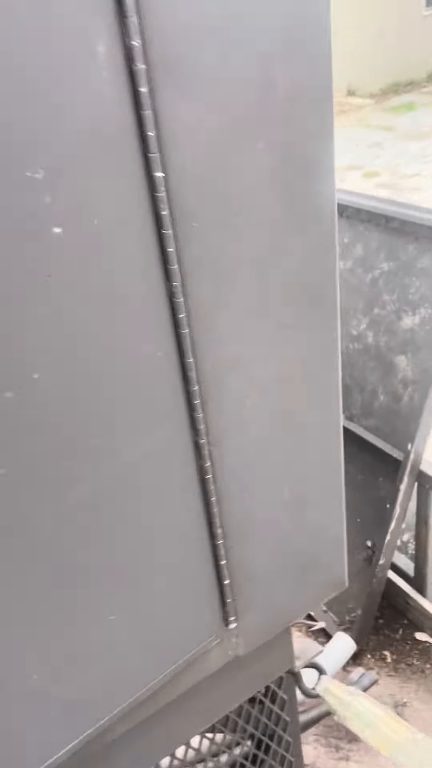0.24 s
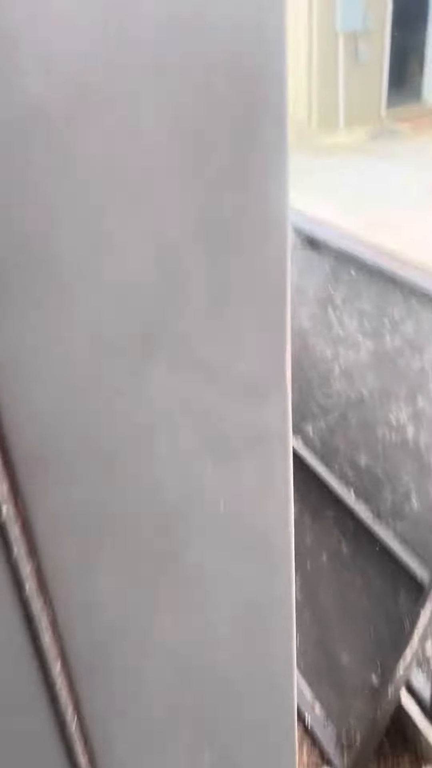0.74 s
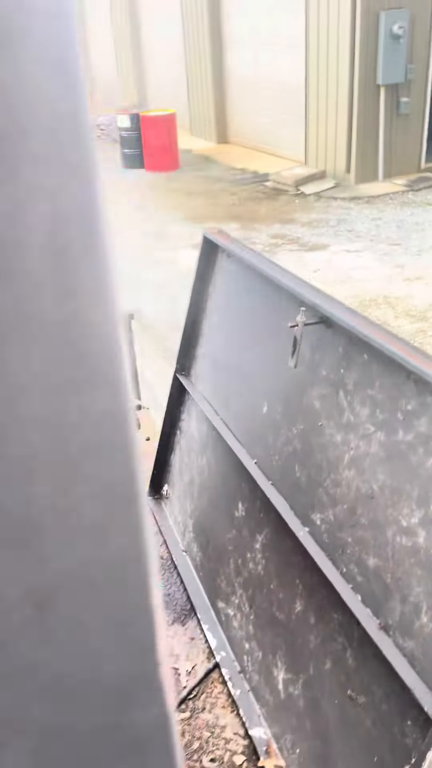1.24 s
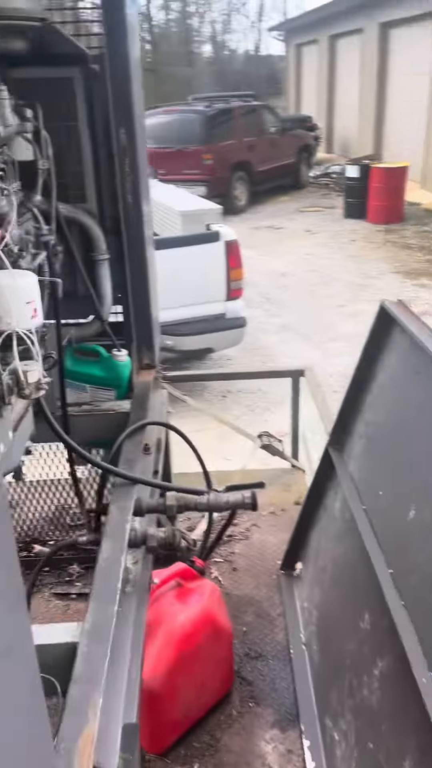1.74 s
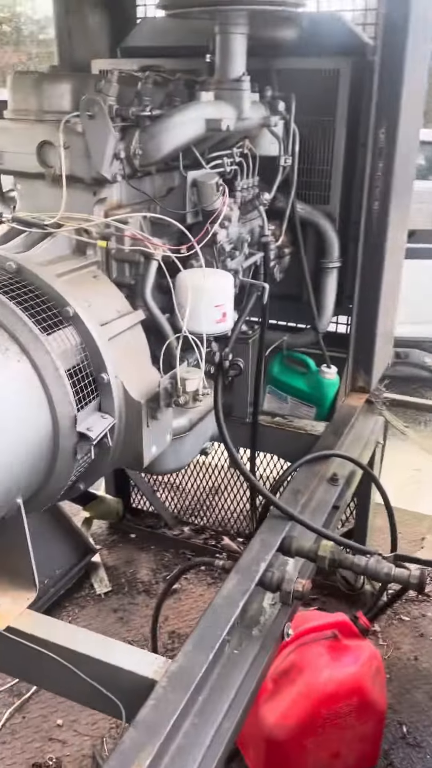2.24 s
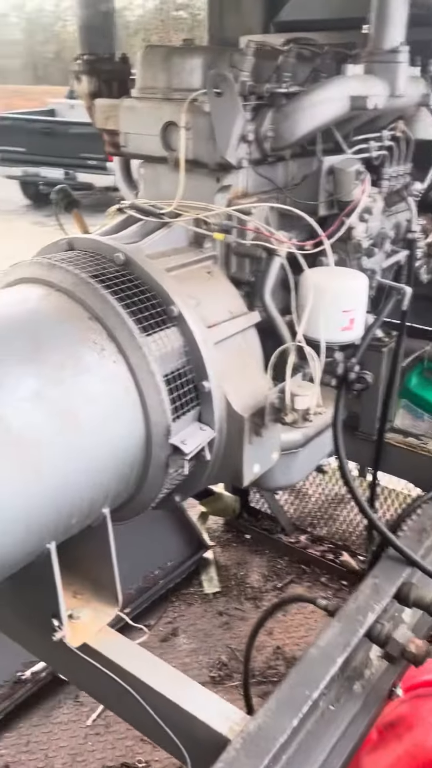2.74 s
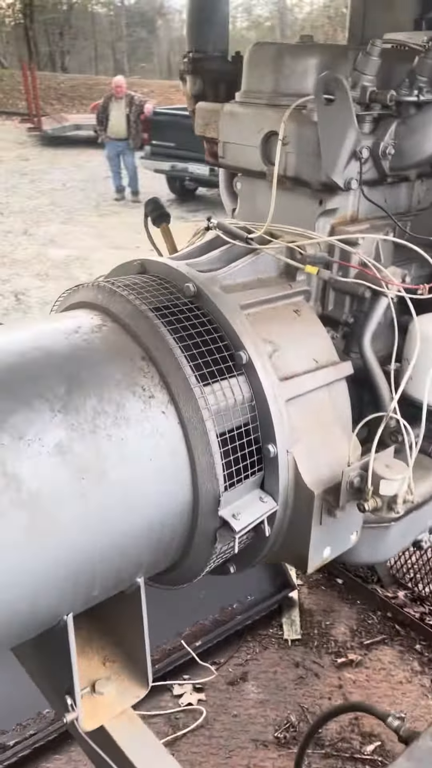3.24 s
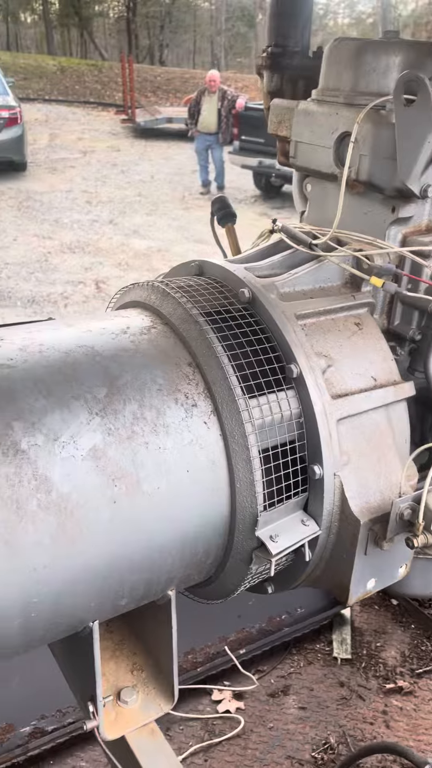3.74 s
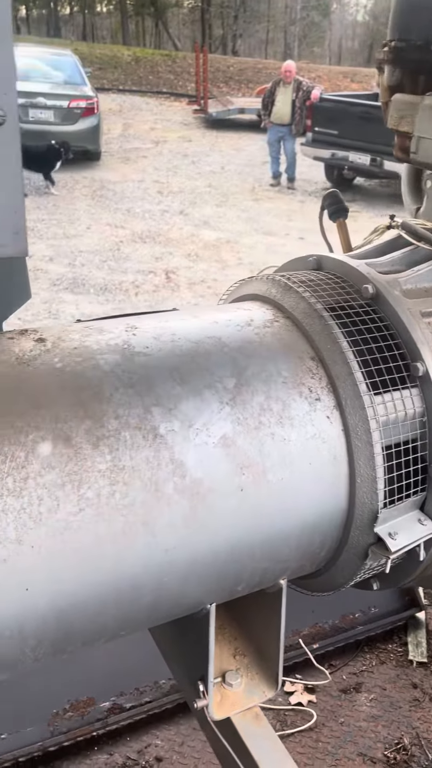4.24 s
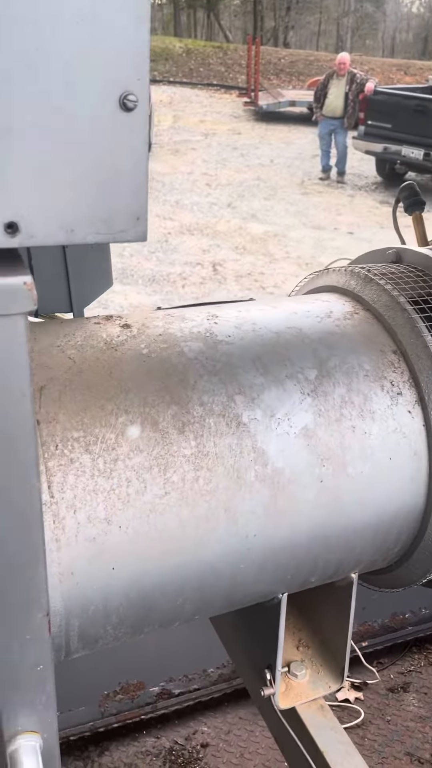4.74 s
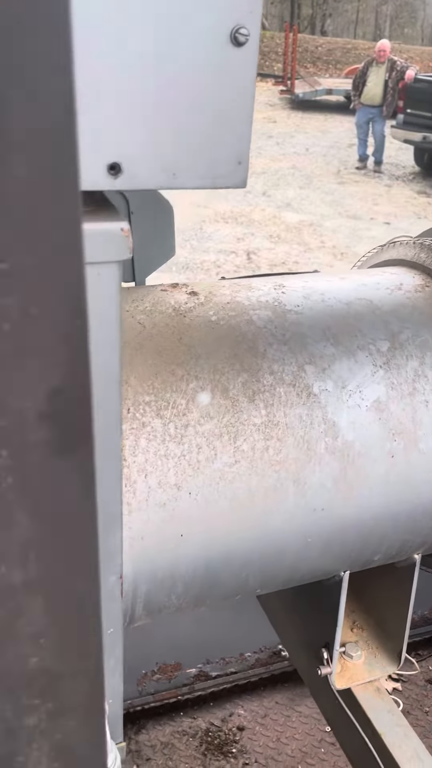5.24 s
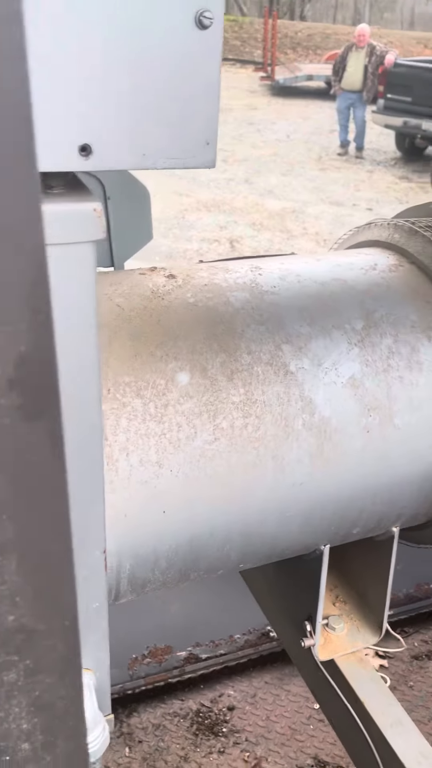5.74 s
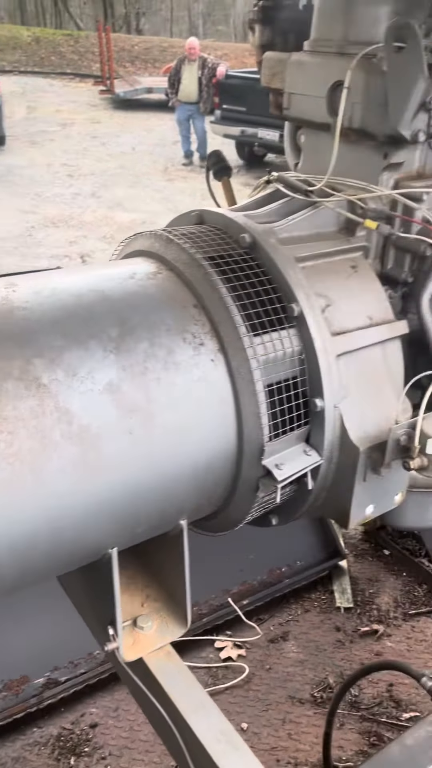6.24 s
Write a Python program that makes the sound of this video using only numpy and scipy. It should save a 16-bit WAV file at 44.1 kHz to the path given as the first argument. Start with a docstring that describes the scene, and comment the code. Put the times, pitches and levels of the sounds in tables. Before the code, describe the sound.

A diesel generator drones at constant speed, muffled behind a metal panel at first, then louder and clattering as the listener walks to its open side.

```python
"""Diesel generator set in an open yard

A diesel generator set runs at steady speed inside a sheet-metal housing; the listener walks round a panel
to the open side. Firing orders and a fan-blade hum are sines locked to the shaft. Housing boom, air roar,
knock, clatter, rattle and hiss are shaped noise, swelling with the firing and, from the knock upward, with
ticks. Moving resonances and a thin dashed whine colour the walk. A two-port microphone with a dull top hears it."""
import sys
import numpy as np
from scipy import signal
from scipy.fft import rfft, irfft, next_fast_len
from scipy.io import wavfile

SR = 44100
rng = np.random.default_rng(int(sys.argv[2]) if len(sys.argv) > 2 else 0)


def master_out(mix):
    """Clip the mix to full scale and print it as 16-bit PCM to the path in sys.argv[1]."""
    frames = np.transpose(np.atleast_2d(mix))
    ceiling = np.clip(frames, -1, 1)
    pcm = np.round(ceiling * 32767).astype(np.int16)
    wavfile.write(sys.argv[1], SR, pcm)


def boost_factor(decibels):
    """Convert a level in decibels to a linear amplitude factor."""
    exponent = np.asarray(decibels, float) / 20
    return 10 ** exponent


N = 286209

SHAFT_HZ = 30.595
FIRING_ORDER, FAN_ORDER = 2, 12   # multiples of the shaft speed

# colour of the engine noise, relative from band to band: f/Hz, density/dB
COLOUR = [(40, -70.5), (55, -55.5), (75, -43.5), (100, -51), (140, -56), (200, -46.5), (450, -49),
          (750, -50.5), (1000, -54), (1600, -57.5), (2400, -64.5), (3400, -73), (4500, -71), (5700, -78),
          (7000, -96.5), (7500, -101.1)]


def in_time(rows):
    """Columns of a table that starts with time, one value a sample."""
    s, *columns = np.transpose(rows)
    return [np.interp(np.arange(N) / SR, s, column) for column in columns]


def at_hz(points, hz):
    """Reads a table of (Hz, value) on a log-frequency axis."""
    table_hz, values = np.transpose(points)
    return np.interp(np.log(hz + 1), np.log(table_hz), values)


def skirts(hz, low_hz, high_hz):
    """Gain of a band with fourth-order slopes on both sides."""
    return 1 / np.sqrt((1 + (low_hz / (hz + 1)) ** 8) * (1 + (hz / high_hz) ** 8))


def unit_mid(x):
    """Scales a stereo pair so that the mean of its channels has rms 1."""
    return x / np.sqrt(np.mean(x.mean(axis=0) ** 2) + 1e-20)


def drift(corner_hz):
    """Slow chance of spread 1: noise at every 40th sample through a double one-pole."""
    pole = np.exp(-2 * np.pi * corner_hz * 40 / SR)
    noise = rng.standard_normal(N // 40 + 2002)
    slow = signal.lfilter([1], [1, -2 * pole, pole ** 2], noise)[2000:]   # settled part only
    return np.interp(np.arange(N) / 40, np.arange(len(slow)), slow / slow.std())


def bells(rows, spread_s):
    """Bell-shaped rises, one for each (time in s, height)."""
    now = np.arange(N) / SR
    return sum(height * np.exp(-.5 * ((now - s) / spread_s) ** 2) for s, height in rows)


def ports(hz):
    """Complex gain of each microphone port: half the balance and half the phase lead to either side."""
    # left over right: f/Hz, level/dB
    balance = [(80, 0.8), (170, -2.5), (300, -6), (480, -1), (750, 2.5), (1200, 0), (1550, 3), (1950, -6),
               (2400, 0), (3500, 0), (4600, 2.5), (5700, 2.5), (6400, 0.5)]
    # left ahead of right: f/Hz, phase/rad
    lead = [(70, 0), (170, -.4), (260, .1), (500, 1.4), (750, 2.0), (1150, 3.0), (1460, 2.0), (1810, 3.0),
            (2150, 2.2), (2500, 2.8), (3450, 2.5), (4200, .5), (5500, 1.3), (6500, .9), (7200, 3.1),
            (8400, 3.0), (9400, 1.6), (10200, 0)]
    sides = np.array([[.5], [-.5]])
    return boost_factor(sides * at_hz(balance, hz)) * np.exp(1j * sides * at_hz(lead, hz))


def port_noise(shape):
    """Noise of a given spectral shape at both ports: a shared part and a part of their own."""
    # how far the ports hear the same noise: f/Hz, likeness/0-1
    likeness = [(80, 0.96), (300, 0.87), (560, 0.64), (740, 0.6), (1050, 0.38), (1330, 0.13), (1500, 0.42),
                (1700, 0.12), (1930, 0.72), (2280, 0.17), (2600, 0.67), (4250, 0.82), (5000, 0.39),
                (6800, 0.5), (7400, 0.93)]
    size = next_fast_len(N)
    hz = np.arange(size // 2 + 1) * SR / size
    shared, *own = rfft(rng.standard_normal((3, size)))
    # the deep bass is all but the same at both ports
    alike = np.clip(at_hz([(70, .995)] + likeness[1:], hz), 0, 1)
    both = np.sqrt(alike) * shared + np.sqrt(1 - alike) * np.array(own)
    return unit_mid(irfft(both * ports(hz) * shape(hz), size)[:, :N])


def noise_band(hz, width_hz):
    """Narrow noise: low-passed complex noise shifted up to a centre that may move."""
    lowpass = signal.butter(4, width_hz / 2, fs=SR, output="sos")
    slow = signal.sosfilt(lowpass, rng.standard_normal((2, N)))
    carrier = np.exp(2j * np.pi * np.cumsum(hz + np.zeros(N)) / SR)
    band = (slow[0] + 1j * slow[1]) * carrier
    return unit_mid((band * ports(np.atleast_1d(hz))).real)


def tone(turns, hz, db, waver_db):
    """A sine of given rms level that wavers slowly, placed by the ports."""
    gains = ports(np.array([hz]))
    wave = np.exp(2j * np.pi * (turns + rng.random())) * gains / abs(gains.mean())
    return np.sqrt(2) * boost_factor(db + waver_db * drift(5.7)) * wave.real


def orders(turns, heard, roar_db):
    """Firing, alternator and fan-blade tones, all whole multiples of the shaft speed."""
    # the two main tones swell and sink across their standing waves: t/s, firing level/dB, fan-blade level/dB
    hum = [(0, -31, -21.5), (.4, -29, -25), (.8, -38.5, -26.5), (1.2, -29.5, -27.5), (1.45, -28.5, -28.5),
           (1.65, -28.5, -38), (1.85, -26.5, -27.5), (2.05, -24, -30), (2.35, -28.5, -26),
           (2.6, -24, -23.5), (2.9, -29, -23.5), (3.2, -30, -21.5), (3.6, -27.5, -20), (4.0, -26, -22),
           (4.35, -32.5, -22), (4.7, -29.5, -24.5), (5.1, -34, -25), (5.4, -29, -25.5), (5.7, -51, -24),
           (6.0, -42.5, -25), (6.49, -39, -21)]
    # overtones of the firing: order, level behind the panel/dB, gain in open view/dB,
    # gain along the set/dB, waver/dB
    overtones = [(4, -37.5, 7, 3, 0.94), (6, -35, -5, 7, 2.5), (8, -41.5, 0.5, -10.5, 3),
                 (16, -43, 2, 4.5, 2)]
    # weaker tones that follow the roar: order, level against the roar/dB
    weak_orders = [(5, -18.5), (10, -21), (11, -19), (13, -27), (14, -22), (18, -25), (19, -30.5)]
    out = 0
    for order, db in zip((FIRING_ORDER, FAN_ORDER), in_time(hum)):
        out = out + tone(order * turns, order * SHAFT_HZ, db, waver_db=1.0)
    for order, hidden_db, view_db, along_db, waver_db in overtones:
        out += tone(order * turns, order * SHAFT_HZ, heard(hidden_db, view_db, along_db), waver_db)
    for order, db in weak_orders:
        out += tone(order * turns, order * SHAFT_HZ, roar_db + db, waver_db=5.5)
    return out


def combustion(turns):
    """Every firing sets the block ringing the same way; the ring changes slowly with the listener's place."""
    cylinders_db = np.array([0, -3, -1, -4])   # strength of each in firing order
    block_t60_s, path_lasts_s = .12, 1.3
    count = np.floor(FIRING_ORDER * turns).astype(int)
    strength_db = cylinders_db[count % len(cylinders_db)] + 2.4 * rng.standard_normal(N)
    pulses = np.diff(count, prepend=0) * boost_factor(strength_db)

    def shape(hz):
        return boost_factor(at_hz(COLOUR, hz)) * skirts(hz, 650, 2600)

    paths = port_noise(shape)
    now, size = np.arange(N) / SR, int(block_t60_s * SR)
    ring_sample = np.arange(size)
    decay = boost_factor(-60 * ring_sample / size) * np.minimum(ring_sample / (.002 * SR), 1)   # 2 ms onset
    out = 0
    for k, s in enumerate(np.arange(0, N / SR + path_lasts_s, path_lasts_s)):
        ring = paths[:, k * size:(k + 1) * size] * decay
        # each path from block to listener crossfades into the next
        share = np.cos(np.pi / 2 * np.clip((now - s) / path_lasts_s, -1, 1))
        out = out + share * signal.fftconvolve(ring, pulses[None], axes=1)[:, :N]
    return unit_mid(out)


def ticks(per_s, decay_s):
    """Valve and injector ticks: sudden swells of uneven size that die away fast."""
    hits = (rng.random(N) < per_s / SR) * rng.exponential(1, N)
    return signal.lfilter([1], [1, -np.exp(-1 / (decay_s * SR))], hits + 1e-18)


def panel_echoes(x, echo_db):
    """Reflections off the housing panels; paths change as the listener moves, so peaks and dips wander."""
    lags_s, sway_s = [.0029, .0047, .0076, .0119], 0.000615
    out, now = x.copy(), np.arange(N)
    for lag_s in lags_s:
        read = np.abs(now - SR * (lag_s + sway_s * drift(0.6145)))
        out += boost_factor(echo_db) * np.array([np.interp(read, now, side) for side in x])
    return unit_mid(out)


def broad(part, level_db, swell, flicker_db, echo_db):
    """One stretch of the noise colour, swelling with the engine's beat and flickering slowly."""
    # borders between the six stretches: f/Hz
    splits = [120, 500, 1000, 1800, 3500]
    # faint treble, continuing the colour upward: f/Hz, density/dB
    air = [(8400, -102), (9300, -106), (10500, -109), (12300, -112), (12900, -130)]
    # rings and dips of housing and engine casting: f/Hz, width/Hz, gain/dB
    casting = [(77.6, 12, 2), (98, 3.1, -6), (102, 13, 5.5), (207, 5.1, -3.5), (640, 4, 4), (742, 130, 2.5),
               (1260, 250, 3), (1562, 78, 3), (1712, 99, 3.5), (2250, 270, 2)]
    low_hz, high_hz = ([1] + splits + [SR])[part:part + 2]

    def shape(hz):
        rings_db = sum(db / (1 + (2 * (hz - mode_hz) / width_hz) ** 2) for mode_hz, width_hz, db in casting)
        return boost_factor(at_hz(COLOUR + air, hz) + rings_db) * skirts(hz, low_hz, high_hz)

    noise = panel_echoes(port_noise(shape), echo_db)
    return boost_factor(level_db + flicker_db * drift(3.4)) * (1 + swell) * noise


def boom(level_db):
    """The housing's lowest resonance as a narrow noise band that swells now and then."""
    # swells: t/s, gain/dB
    swells = [(.3, 11), (.9, 7), (2.05, 5), (2.7, 4.5), (3.5, 5.5), (4.2, 4), (5.1, 5.5), (6.1, 8.5)]
    return boost_factor(level_db - 2 + bells(swells, spread_s=0.14)) * noise_band(77.1, 16)


def gap():
    """Roar surging unevenly through a resonance beside the panel, rising as the gap widens."""
    # path of the resonance: t/s, f/Hz, level/dB
    gap_path = [(1.1, 201.4, -42), (1.5, 220, -28), (1.75, 310, -28), (2.0, 422, -33), (2.3, 502, -28),
                (2.7, 553, -41.5)]
    hz, db = in_time(gap_path)
    return boost_factor(db + 2.1 * drift(10.0)) * noise_band(hz, width_hz=173)


def spot_rings():
    """Resonances that each swell and fade as the listener passes one spot of the walk."""
    # t/s, spread/s, f/Hz, width/Hz, level/dB
    spots = [(.4, .55, 2850, 703, -56.5), (.4, .45, 1043, 300, -45.5), (.7, 0.25, 2455, 410, -55),
             (0.699, 0.35, 219.7, 80.2, -27.5), (1.5, 0.28, 4920, 1490, -50), (1.5, 0.2, 215, 98.5, -30.5),
             (1.85, 0.28, 254.3, 90.4, -30.5), (2.301, 0.29, 2270, 494, -49),
             (4.499, 0.55, 75.1, 22.1, -29), (1.9, 0.44, 950, 201, -38), (3.301, .3, 115, 30.2, -36),
             (3.5, 0.53, 1570, 160.5, -37.5), (3.5, 0.21, 5300, 1167, -51.5), (4.65, 0.45, 1344, 185, -34),
             (4.75, 0.23, 777, 141, -32), (5.4, 0.47, 1597, 300, -37.5), (5.75, 0.33, 176.4, 40, -37),
             (1.95, 0.057, 420, 70, -25)]
    out = 0
    for s, spread_s, hz, width_hz, db in spots:
        out = out + boost_factor(db) * bells([(s, 1)], spread_s) * noise_band(hz, width_hz)
    return out


def whine():
    """A slightly unsteady high tone, faint throughout, with short dashes early in the walk."""
    # dashes: start t/s, length/s, level/dB
    dashes = [(0, 0.045, -50.5), (.105, 0.082, -54), (0.243, .065, -53), (0.348, .025, -60),
              (0.74, 0.025, -59), (.85, .025, -53), (.94, 0.025, -51)]
    whine_hz, steady_db, edge_s = 4450, -62.5, .012
    turns, now = np.cumsum(whine_hz + 4.8 * drift(40)) / SR, np.arange(N) / SR
    gain = boost_factor(steady_db)
    for s, length_s, db in dashes:
        inside_s = np.minimum(now - s, s + length_s - now)
        gain = gain + boost_factor(db) * np.clip(inside_s / edge_s + .5, 0, 1)
    return gain * tone(turns, whine_hz, 0, waver_db=1)


def scene():
    """All layers of the running set, their levels following the walk."""
    # the walk: t/s, share of the engine in open view/0-1, way from radiator end to alternator end/0-1
    walk = [(0, 0.04, 0.1), (.4, 0, 0), (.8, 0.1, 0.15), (1.15, 0.05, 0.1), (1.55, 0.5, 0), (2.0, 0.58, 0),
            (2.5, 0.7, 0.04), (2.9, 0.88, 0.2), (3.3, 0.85, 0.8), (3.7, 0.86, 1), (4.2, 0.77, 1),
            (4.7, 0.79, 0.6), (5.2, 0.65, 0.96), (5.6, 0.55, 0.98), (6.0, 0.49, 1), (6.49, 0.7, 1)]
    # boom, roar, knock, clatter, rattle, hiss: level behind the panel/dB, gain in open view/dB,
    # gain along the set/dB
    layers = [(-39.5, 8, 3), (-25, 5, -2), (-31.5, 2.5, 2.5), (-35.5, 7, 1), (-39.5, 4.5, -0.7),
              (-49.5, 7, 1.5)]
    view, along = in_time(walk)

    def heard(hidden_db, view_db, along_db):
        return hidden_db + view_db * view + along_db * along

    boom_db, roar_db, knock_db, clatter_db, rattle_db, hiss_db = (heard(*row) for row in layers)
    turns = np.cumsum(SHAFT_HZ + 0.014 * drift(0.53)) / SR
    firing = np.cos(2 * np.pi * FIRING_ORDER * turns)
    out = orders(turns, heard, roar_db)
    out += boost_factor(clatter_db - 9) * combustion(turns)
    out += boom(boom_db)
    out += broad(0, boom_db, 0.036 * firing, flicker_db=-0.6, echo_db=-11.0)
    out += broad(1, roar_db, 0.019 * firing, flicker_db=-0.32, echo_db=-25.5)
    knock_swell = 0.019 * firing + 0.074 * ticks(per_s=31.0, decay_s=0.012)
    out += broad(2, knock_db, knock_swell, flicker_db=1.08, echo_db=-10.0)
    clatter_swell = 0.027 * firing + 0.055 * ticks(per_s=37.0, decay_s=0.011)
    out += broad(3, clatter_db, clatter_swell, flicker_db=1.27, echo_db=-7.0)
    rattle_swell = 0.044 * firing + 0.075 * ticks(per_s=40.0, decay_s=0.013)
    out += broad(4, rattle_db, rattle_swell, flicker_db=1.3, echo_db=1.5)
    hiss_swell = .02 * firing + 0.15 * ticks(per_s=60.0, decay_s=0.0072)
    out += broad(5, hiss_db, hiss_swell, flicker_db=1.38, echo_db=-5)
    return out + gap() + spot_rings() + whine()


def top_cut(x):
    """Nothing passes above the cut-off."""
    return signal.sosfilt(signal.butter(12, 13000, fs=SR, output="sos"), x)


def record(dry):
    """Short fades at both ends of the mix."""
    end_s = N / SR
    fade = np.interp(np.arange(N) / SR, [0, .002, end_s - .03, end_s], [0, 1, 1, 0])
    return top_cut(dry * fade)


dry = scene()
out = record(dry)
master_out(out)
```